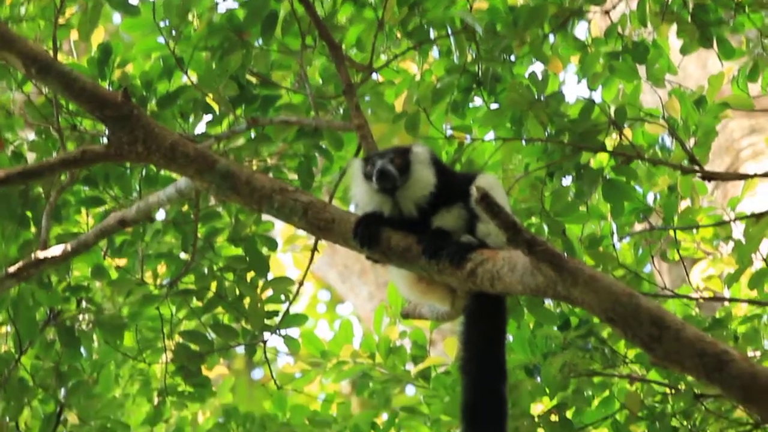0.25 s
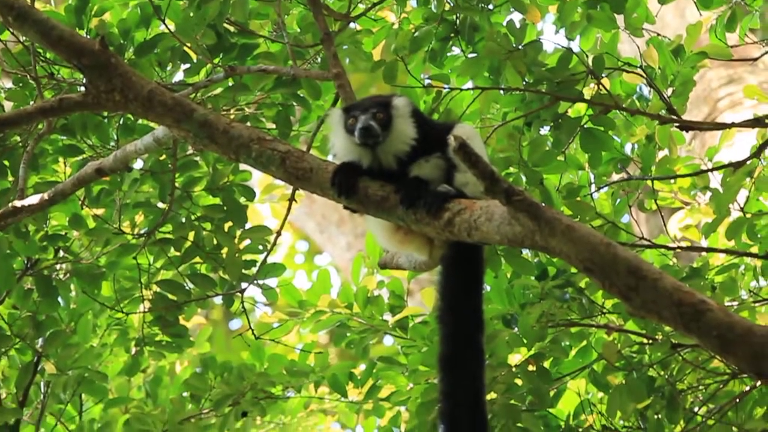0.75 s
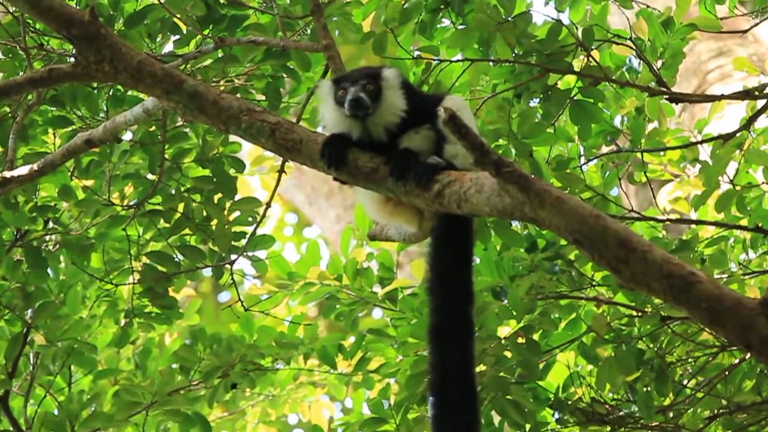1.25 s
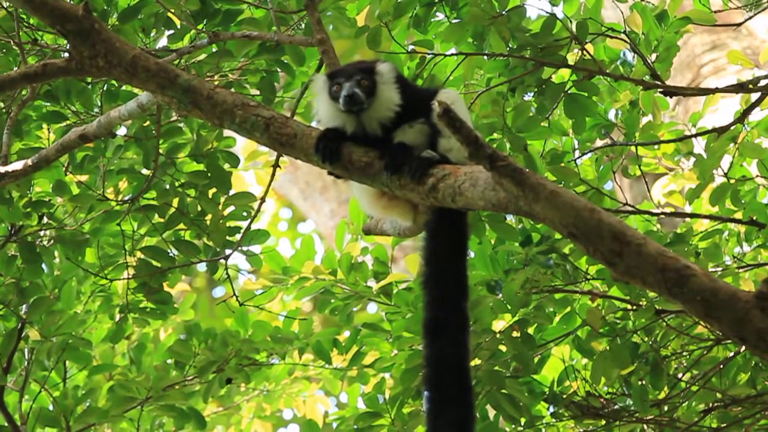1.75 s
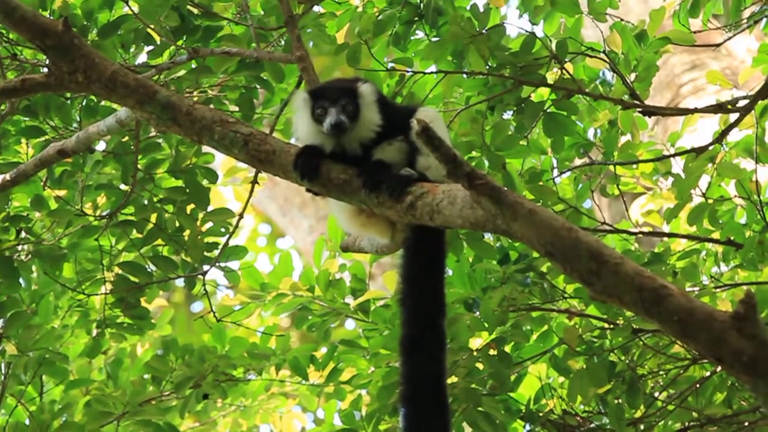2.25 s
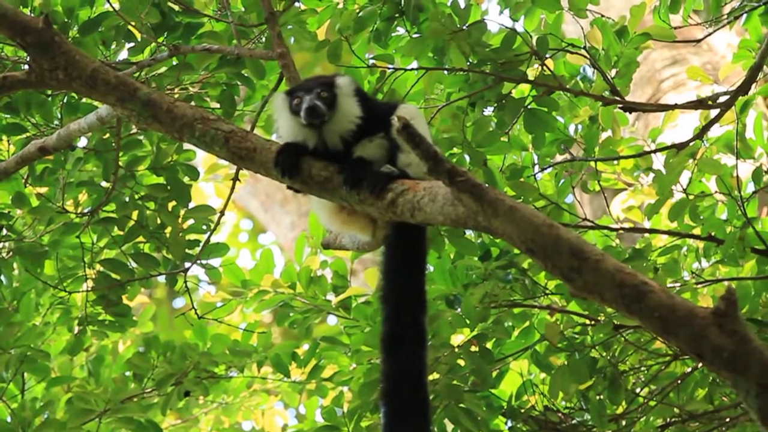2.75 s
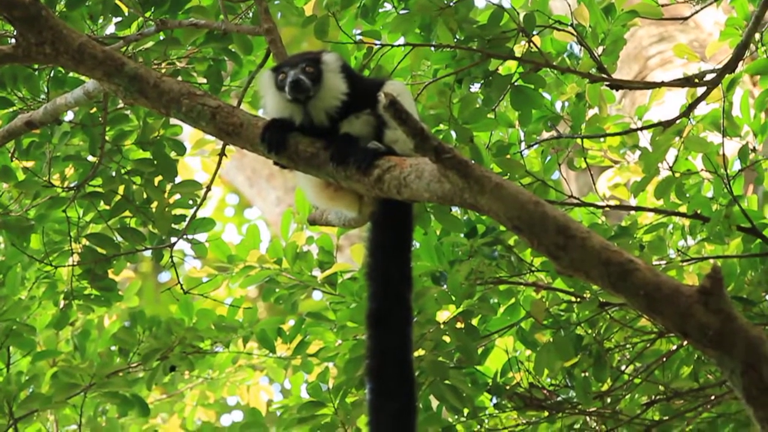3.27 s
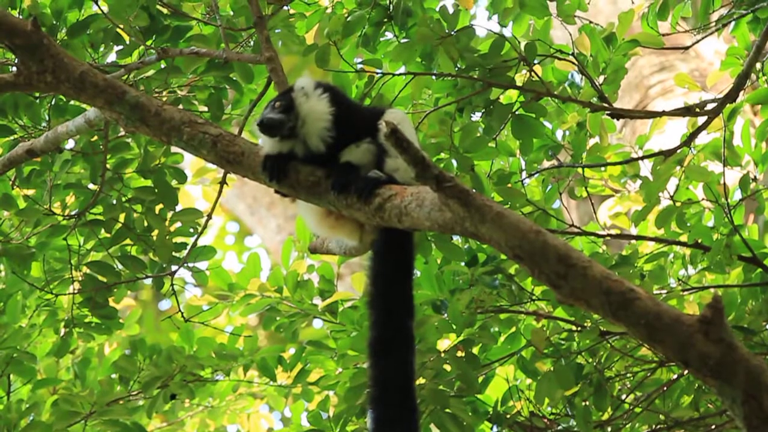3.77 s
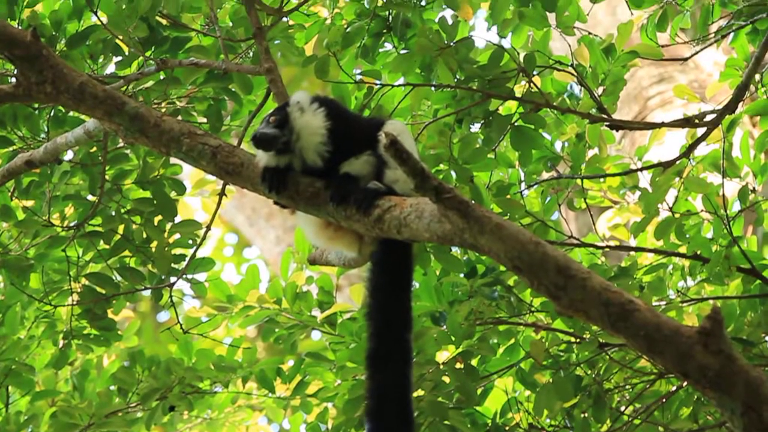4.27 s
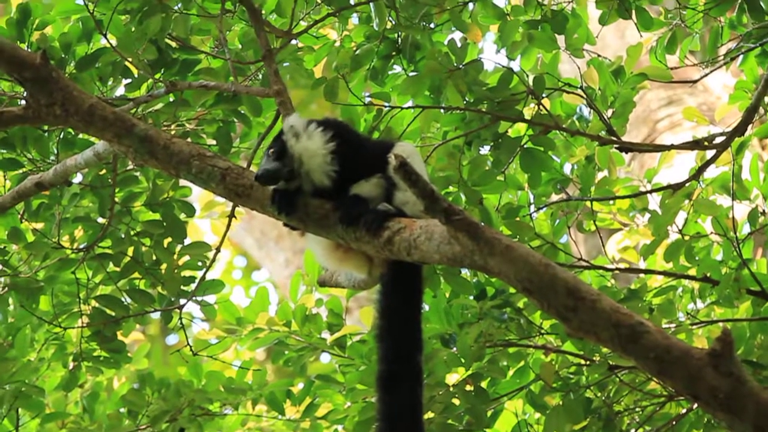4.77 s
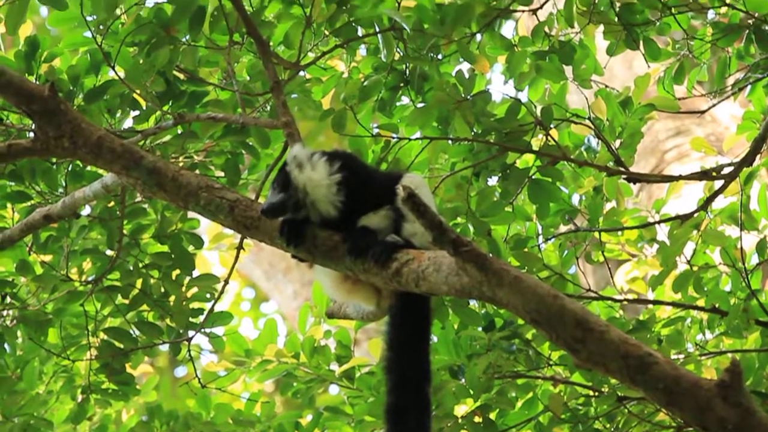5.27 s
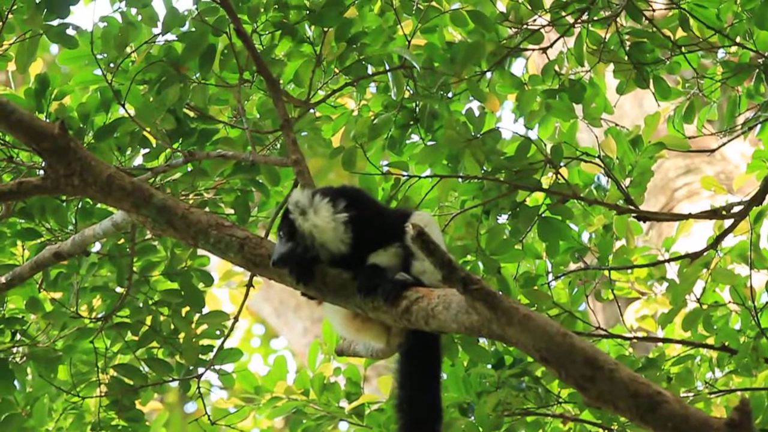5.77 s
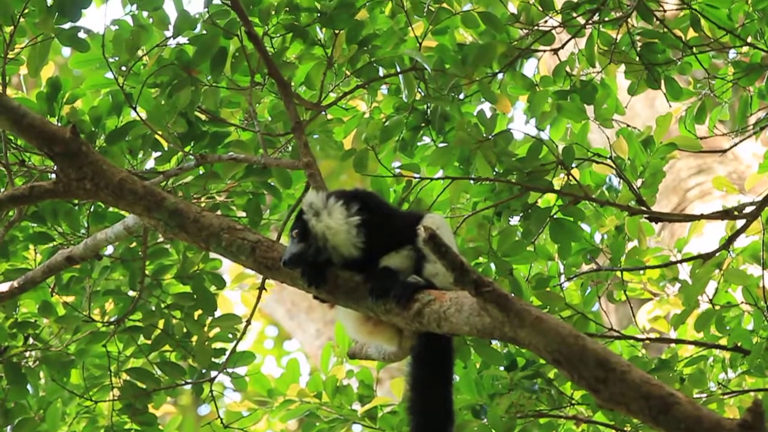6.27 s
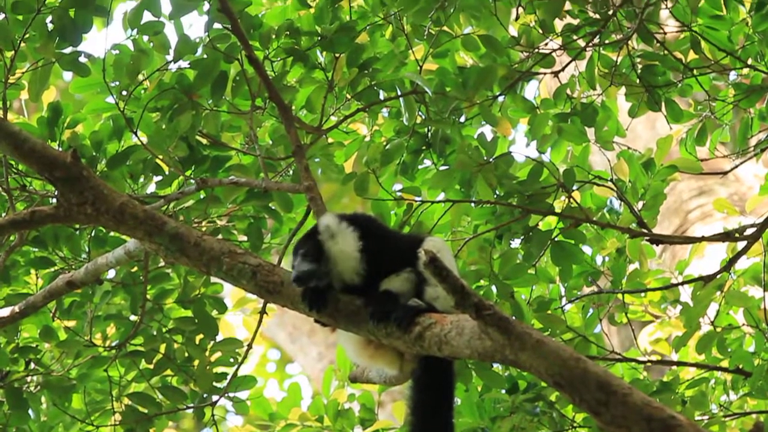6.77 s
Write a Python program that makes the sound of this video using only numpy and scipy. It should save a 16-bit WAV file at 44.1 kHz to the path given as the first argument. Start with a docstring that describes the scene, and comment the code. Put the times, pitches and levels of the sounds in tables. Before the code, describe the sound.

A dense tropical forest heard from under the canopy, the same in both channels. Throughout, a steady, very high insect hiss sits over a quiet low wash with faint hollow tones and thin cricket trills. A distant crowd of small, probably frog-like callers makes a blurred clicking bed around 2 kHz, with individual clicks standing out irregularly, some clear, others softened by leaves. From 0.9 s a closer caller gives sharp, ringing clicks with quick echoes and a forest tail, again near 1.6, 2.3, 2.9, 3.6, 4.5, 5.4 and 6.6 s. Tiny double bush-cricket pings tick at the start, 0.9, 2.5, 3.9 and 5.4 s. Very soft woody knocks fall near 1.0 and 2.5 s, with a clearer pair around 5.7-5.8 s. Cicadas sink at first, then swell from 3.4 s into a fluttering high band by 7 s.

```python
"""A rainforest under the canopy, the same in both channels.
From the start: insect hiss high up, a crowd of clicking callers, a low wash and thin cricket lines, all shaped noise.
A bush cricket's paired pings tick now and then; small callers, probably frogs, click through leaf scatter.
A close one joins with ringing resonances and echoes, then a few soft knocks, as filtered reflections.
Cicadas, a noise band, sink at first, then swell from 3.4 s."""
import sys
import numpy as np
from scipy import signal
from scipy.fft import rfft, irfft, next_fast_len
from scipy.io import wavfile
from scipy.ndimage import uniform_filter1d

SR = 44100
rng = np.random.default_rng(int(sys.argv[2]) if len(sys.argv) > 2 else 0)


def materialize(psi):
    """Save the field psi as 16-bit PCM at rate SR to the path in sys.argv[1].

    A 1-D psi becomes a single channel; in a 2-D psi each row is a channel.
    """
    bounded = np.clip(np.atleast_2d(psi).T, -1, 1)
    quanta = np.round(bounded * 32767).astype(np.int16)
    wavfile.write(sys.argv[1], SR, quanta)


N = 309701
TIME_S = np.arange(N) / SR

# insect hiss spectrum: freq_hz, density_db (relative)
HISS_SPECTRUM = [(6500, -24.5), (7500, -18.5), (8200, -6.5), (8700, -4.5), (9800, -5), (10750, -11),
                 (11600, -4), (12600, 0), (13600, -.5), (14300, -1.3), (14900, -0.3), (15600, -9),
                 (16500, -19)]
# cicada spectrum: freq_hz, density_db (relative)
CICADA_SPECTRUM = [(7000, -55), (8000, -15), (8550, -4), (9300, -6.5), (10050, -2.5), (10500, -9),
                   (11200, -23), (12500, -53)]
# cicada level before flutter: time_s, level_db
CICADA_SWELL = [(0, -55), (3.4, -66), (4, -49), (4.7, -46.5), (5.5, -42.5), (7, -41)]
# chorus spectrum before resonances: freq_hz, density_db (relative)
CHORUS_SPECTRUM = [(1200, -36), (1580, -22.5), (1780, -4.5), (2050, -6), (2350, -3), (2560, -1.5),
                   (2850, -11), (3200, -17.5), (4400, -19.5), (5400, -25.5), (7000, -19.5), (11000, -23)]
# chorus swell before trim and lulls: time_s, level_db
CHORUS_SWELL = [(0, -41), (.64, -39), (.78, -42.5), (1.11, -42.5), (1.27, -38.5), (1.77, -40), (2.12, -42),
                (2.52, -44), (2.62, -37.5), (2.76, -42), (3.05, -41), (3.76, -41.5), (3.94, -40),
                (4.42, -40.5), (4.94, -43), (5.3, -40.5), (5.8, -39), (6.08, -41.5), (7.02, -40.5)]
# wash spectrum: freq_hz, density_db (relative)
WASH_SPECTRUM = [(20, -41), (60, -11), (130, -6), (240, 0.5), (340, -3), (440, -1), (650, -5), (800, -1),
                 (950, -9.5), (1500, -9.5), (4000, -8), (8000, -12), (16000, -55)]
# slow level of the wash: time_s, level_db
WASH_SWELL = [(0, -49.5), (5, -49), (5.7, -47), (6.2, -50), (7.02, -49.5)]
# hollow tones in the wash, level before wavering: centre_hz, half_width_hz, level_db
HOLLOW_TONES = [(329.5, 19, -66.5), (542.6, 24, -60), (743, 45, -61)]
# steady crickets, level before the swell: pitch_hz, level_db, loudest_s
CRICKET_LINES = [(3505, -70, 1), (4355, -68, 1.5), (5760, -68, 5.2), (6255, -71, 3.8), (6858, -68, 1)]
# bush cricket ticks, level before trim, pitch at mid-glide: start_s, level_db, pitch_hz
BUSH_TICKS = [(0.035, -37.5, 8600), (0.872, -40.5, 8100), (2.524, -40, 8070), (3.908, -40, 8200),
              (5.355, -39.5, 8050)]
# far frog clicks that stand out: start_s, level_db, leaf_cover (0-1)
FAR_CALLS = [(0.229, -29, 0.45), (0.3317, -28, 0.14), (0.4345, -36, 0.18), (0.8371, -33.5, .7),
             (1.2205, -35.5, 1), (1.262, -32.5, 0.2), (1.5055, -30, .05), (1.937, -30, 1),
             (2.2449, -34.5, 0.7), (2.3372, -31, 0), (2.808, -28.5, 0.63), (3.188, -32, 0.7),
             (3.292, -27.5, 0.22), (3.605, -30, 0.24), (4.159, -28.5, 0), (4.492, -29, 0.26),
             (4.6834, -37, 0.9), (4.759, -30.5, 0.66), (5.02, -35.5, 1), (5.051, -29, 0.2),
             (5.447, -31, 0.12), (5.944, -35.5, 0.16), (6.135, -31, 0.5), (6.196, -30.5, 0.5),
             (6.539, -33, 0.9), (6.9055, -34, 1)]
# far frog spectrum before resonances: freq_hz, density_db (relative)
FAR_SPECTRUM = [(900, -34.5), (1540, -21.5), (1800, 0.5), (2050, -3.5), (2450, 1), (2700, -2.5),
                (3200, -12), (4400, -12), (5400, -16), (7000, -19.5), (11000, -34)]
# resonances shared by far frogs and chorus: centre_hz, half_width_hz, lift_db
FAR_RESONANCES = [(1875, 65, 4), (2300, 90, 4), (2920, 38, 3.5), (3085, 35, 3)]
# close frog calls, before travel delay: start_s, level_db
NEAR_CALLS = [(0.8830, -24), (1.5688, -25), (2.3018, -25), (2.8936, -25.5), (3.6293, -25), (4.5146, -26),
              (5.4259, -25), (6.5587, -25)]
# close frog resonances: pitch_hz, level_db (relative), t60_s
NEAR_RESONANCES = [(1849, -0.5, 0.048), (2310, -38, 0.028), (2590, 5.5, 0.0083), (2666, -14.5, 0.085),
                   (2923, -11.5, 0.066), (3100, -13.5, 0.058), (3560, -16, 0.056), (4370, 0.5, 0.0045),
                   (6030, -0.5, 0.0025)]
# band the close click fills: freq_hz, gain_db
NEAR_SPECTRUM = [(900, -21), (1480, -16), (1720, -5), (5400, 1.5), (6900, 2.5), (7350, -29), (11000, -25)]
# echoes off the ground and a trunk: delay_s, gain (linear)
NEAR_ECHOES = [(.00483, .56), (.0126, .14)]
# soft knocks on wood, thin below low_hz, dull above high_hz: start_s, level_db, low_hz, high_hz
WOOD_KNOCKS = [(1.010, -42, 220, 900), (2.515, -46, 400, 517), (5.7169, -34, 200, 3600),
               (5.805, -40.5, 1100, 1500)]


def amp(db):
    """Decibels to gain."""
    return 10 ** (np.asarray(db) / 20)


def unit(x):
    """Scales to rms 1."""
    return x / np.sqrt(np.mean(x ** 2) + 1e-20)


def unit_burst(x, size=260):
    """Scales so that the loudest 6 ms or so have rms 1."""
    return x / np.sqrt(uniform_filter1d(x ** 2, size, mode="constant").max() + 1e-20)


def shape_db(points, hz, bumps=()):
    """Reads a spectrum on a log-frequency axis and lifts its resonances."""
    freq_hz, db = np.transpose(points)
    lifts_db = sum(lift_db / (1 + ((hz - centre_hz) / half_width_hz) ** 2)
                   for centre_hz, half_width_hz, lift_db in bumps)
    return np.interp(np.log(hz + 1), np.log(freq_hz), db) + lifts_db


def curve(rows):
    """Gain over time from (time_s, level_db) rows."""
    return amp(np.interp(TIME_S, *np.transpose(rows)))


def add(mix, start_s, sound):
    """Mixes a sound in at start_s, cut at the end of the mix."""
    part = mix[max(round(start_s * SR), 0):][:len(sound)]
    part += sound[:len(part)]


def colour(x, points, bumps=()):
    """Gives x a spectrum with optional resonant bumps, at rms 1."""
    size = next_fast_len(len(x))
    db = shape_db(points, np.fft.rfftfreq(size, 1 / SR), bumps)
    return unit(irfft(rfft(x, size) * amp(db), size)[:len(x)])


def band(centre_hz, half_width_hz):
    """Noise in one narrow resonance, at rms 1."""
    size = next_fast_len(N)
    hz = np.fft.rfftfreq(size, 1 / SR)
    resonance = 1 / (1 + ((hz - centre_hz) / half_width_hz) ** 2)
    return unit(irfft(rfft(rng.standard_normal(size)) * resonance, size)[:N])


def drift(rate_hz):
    """Smooth random wander of rms 1, mostly below rate_hz."""
    knots_s = np.arange(0, N / SR + 1, 1 / 400)
    hz = np.fft.rfftfreq(len(knots_s), knots_s[1])
    noise = rng.standard_normal(len(knots_s))
    slow = irfft(rfft(noise) / (1 + (hz / rate_hz) ** 4), len(knots_s))
    return unit(np.interp(TIME_S, knots_s, slow))


def snap(points, bumps=(), treble_db=0, size=8192):
    """Minimum-phase ring of one impulse through a spectrum with resonant bumps."""
    hz = abs(np.fft.fftfreq(size, 1 / SR))
    tilt = shape_db([(2600, 0.4), (4000, 0.78)], hz)  # share of treble_db at each frequency
    log_gain = np.log(amp(shape_db(points, hz, bumps) + treble_db * tilt))
    return np.fft.ifft(np.exp(np.conj(signal.hilbert(log_gain)))).real[:size // 2]


def scatter(t60_s, bloom_s=0.001, share=0.22, size=17000):
    """Sparse reflections off leaves and trunks, building up and dying away, with energy 1."""
    t_s = np.arange(size) / SR
    draw = rng.random(size) - .5
    taps = np.sign(draw) * (abs(draw) < share / 2)
    taps *= np.exp(-np.log(1000) * t_s / t60_s) * (1 - np.exp(-t_s / bloom_s))
    return taps / np.linalg.norm(taps)


def insect_hiss(level_db=-39.5):
    """Insects too many to tell apart: steady noise with a high spectrum."""
    return amp(level_db) * colour(rng.standard_normal(N), HISS_SPECTRUM)


def cicadas(flutter_db=0.96):
    """Cicadas too many to tell apart: a noise band that flutters a little as it swells."""
    crowd = colour(rng.standard_normal(N), CICADA_SPECTRUM)
    return crowd * amp(flutter_db * drift(rate_hz=19)) * curve(CICADA_SWELL)


def chorus(clicks_per_s=65, spread_db=3.3, blur_db=3, trim_db=0.75):
    """Distant clicks blurred by the forest into a wash that dips just before each nearer frog calls."""
    levels_db = spread_db * np.clip(rng.standard_normal(N), -2, 2)
    clicks = (rng.random(N) < clicks_per_s / SR) * amp(levels_db)
    grains = unit(signal.fftconvolve(clicks, scatter(t60_s=0.084))[:N])
    crowd = colour(grains + amp(blur_db) * rng.standard_normal(N), CHORUS_SPECTRUM, FAR_RESONANCES)
    lull_db, lead_s, half_length_s = -1.5, 0.035, 0.076
    calls = list(NEAR_CALLS) + list(FAR_CALLS)
    lull = np.max([np.exp(-((TIME_S - start_s + lead_s) / half_length_s) ** 2)
                   for start_s, *_ in calls], axis=0)
    return amp(trim_db + lull_db * lull) * curve(CHORUS_SWELL) * crowd


def wash(waver_db=1.5):
    """Low rush of the far surroundings: shaped noise plus hollow resonances, each wavering alone."""
    out = colour(rng.standard_normal(N), WASH_SPECTRUM) * curve(WASH_SWELL)
    for centre_hz, half_width_hz, level_db in HOLLOW_TONES:
        out += band(centre_hz, half_width_hz) * amp(level_db + waver_db * drift(rate_hz=1.9))
    return out


def crickets(half_width_hz=22, swell_db=5, passage_s=0.46):
    """Faint thin trills, smeared by distance into narrow bands, each swelling once."""
    out = np.zeros(N)
    for pitch_hz, level_db, loudest_s in CRICKET_LINES:
        swell = np.exp(-((TIME_S - loudest_s) / passage_s) ** 2) + 0.5
        out += band(pitch_hz, half_width_hz) * amp(level_db + swell_db * swell)
    return out


def bush_cricket(forest_db=7, forest_t60_s=0.45, far_pitch_ratio=1.056, trim_db=-1.0, glide_hz=2200):
    """Two quick wing strokes, each a brief upward-gliding ping, trailed by the forest."""
    stroke_s, stroke_spacing_s = .002, .0135  # spacing is start to start
    out = np.zeros(N)
    t_s = np.arange(0, stroke_s, 1 / SR)
    envelope = np.sin(np.pi * t_s / stroke_s)
    for start_s, level_db, pitch_hz in BUSH_TICKS:
        turns = np.cumsum(pitch_hz + glide_hz * (t_s / stroke_s - .5)) / SR
        # small leaves scatter the upper part of the ping best
        far_ping = envelope * np.sin(2 * np.pi * far_pitch_ratio * turns)
        stroke = amp(forest_db) * signal.fftconvolve(scatter(forest_t60_s), far_ping)
        add(stroke, 0, envelope * np.sin(2 * np.pi * turns))
        stroke = amp(level_db + trim_db) * unit_burst(stroke)
        add(out, start_s, stroke)
        add(out, start_s + stroke_spacing_s, stroke)
    return out


def far_frogs(leaves_db=5, leaves_t60_s=0.076, forest_db=1, forest_t60_s=0.43, cover_db=7, bloom_s=0.0094,
              open_treble_db=-14, cover_treble_db=11, pitch_hz=2270, pitch_db=7):
    """Leaf cover weakens the direct click and its pitch, and makes the scatter longer and hissier."""
    strays_per_s, stray_db = 2, -37  # further clicks at random times
    out = np.zeros(N)
    chance = rng.random((round(strays_per_s * N / SR), 2))
    strays = [(when * N / SR, stray_db, cover) for when, cover in chance]
    for start_s, level_db, cover in list(FAR_CALLS) + strays:
        cover = np.clip(cover, .05, 1)
        openness = (1 - cover) ** 2
        path = amp(leaves_db) * scatter(leaves_t60_s, bloom_s * cover)
        path += amp(forest_db + cover_db * cover) * scatter(forest_t60_s, bloom_s)
        path[0] += openness  # direct click
        resonances = list(FAR_RESONANCES) + [(pitch_hz, 90, pitch_db * openness)]
        treble_db = open_treble_db + cover_treble_db * cover
        call = signal.fftconvolve(path, snap(FAR_SPECTRUM, resonances, treble_db, size=4096))
        add(out, start_s, amp(level_db) * unit_burst(call))
    return out


def sweep(x, size=8192):
    """Delays each frequency in proportion to its height, so a click becomes a quick upward chirp."""
    delay_s, top_hz = .0007, 7000  # delay reached at top_hz
    hz = np.fft.rfftfreq(size, 1 / SR)
    return irfft(rfft(x, size) * np.exp(-1j * np.pi * delay_s * hz ** 2 / top_hz), size)


def near_frog(forest_db=-.5, forest_t60_s=0.46, trunk_db=-10, trunk_delay_s=.0348, travel_s=.0003):
    """One sharp ringing click from a fixed perch: same first echoes, fresh forest scatter each time."""
    t_s = np.arange(SR // 12) / SR
    ring = np.zeros(len(t_s))
    for pitch_hz, level_db, t60_s in NEAR_RESONANCES:
        # longer rings build up more slowly
        build_up = 1 - np.exp(-t_s / (.01 * t60_s))
        ring += amp(level_db - 60 * t_s / t60_s) * build_up * np.sin(2 * np.pi * pitch_hz * t_s)
    voice = sweep(signal.fftconvolve(ring, snap(NEAR_SPECTRUM)))
    click = voice.copy()
    for delay_s, gain in NEAR_ECHOES:
        add(click, delay_s, gain * voice)
    click = unit_burst(click)
    # the forest, and a farther trunk behind leaves, return the click duller
    dull = snap(FAR_SPECTRUM, FAR_RESONANCES)
    dull *= amp(forest_db) * np.linalg.norm(click) / np.linalg.norm(dull)
    add(click, trunk_delay_s, amp(trunk_db) * dull)
    out = np.zeros(N)
    for start_s, level_db in NEAR_CALLS:
        add(out, start_s + travel_s, amp(level_db) * click)
        add(out, start_s + travel_s, amp(level_db) * signal.fftconvolve(scatter(forest_t60_s), dull))
    return out


def knocks(forest_db=-3, forest_t60_s=.16, contact_t60_s=0.0052):
    """Short woody taps, each a brief rough contact with a little of the forest behind it."""
    out = np.zeros(N)
    for start_s, level_db, low_hz, high_hz in WOOD_KNOCKS:
        path = amp(forest_db) * scatter(forest_t60_s)
        path += scatter(contact_t60_s, bloom_s=0.00011)
        spectrum = [(low_hz / 4, -25), (low_hz, 0), (high_hz, -1), (2 * high_hz, -18), (high_hz * 4, -42)]
        add(out, start_s, amp(level_db) * unit_burst(signal.fftconvolve(path, snap(spectrum))))
    return out


def scene():
    """Sums all sources, alike in both channels."""
    mix = insect_hiss() + cicadas() + chorus() + wash() + crickets()
    mix += bush_cricket() + far_frogs() + near_frog() + knocks()
    return np.array([mix, mix])


def record(dry):
    """Limits the band with a steep linear-phase low-pass."""
    edge_hz = 15850
    lowpass = signal.firwin(601, edge_hz, window=("kaiser", 9), fs=SR)
    return signal.oaconvolve(dry, lowpass[None], "same")


dry = scene()
out = record(dry)
materialize(out)
```